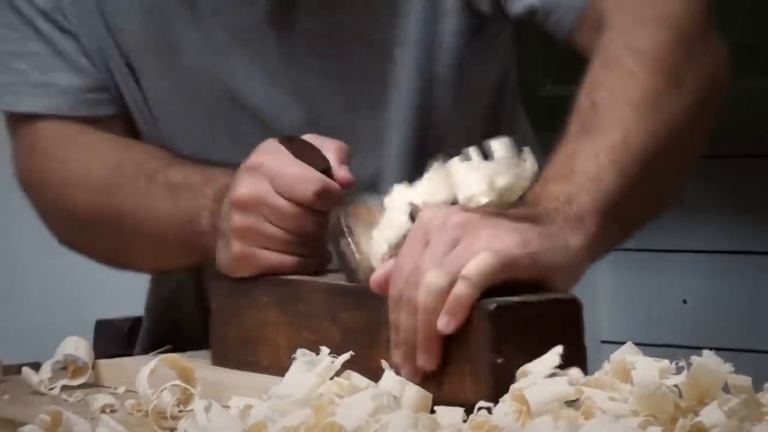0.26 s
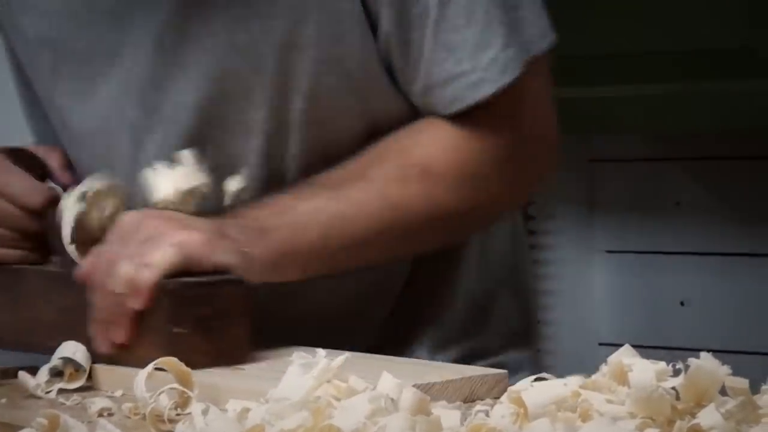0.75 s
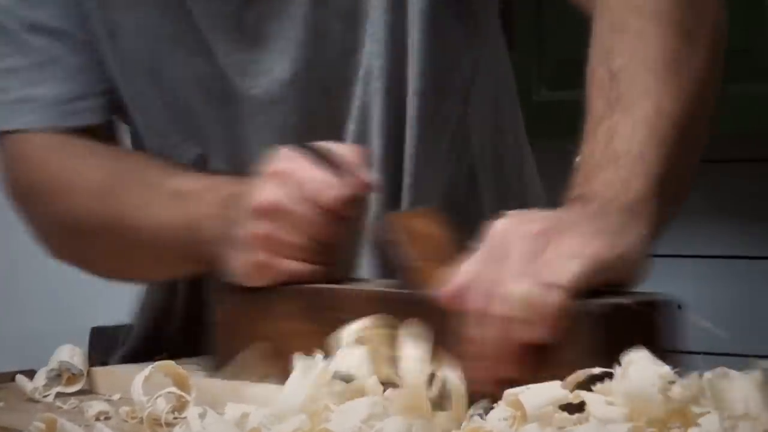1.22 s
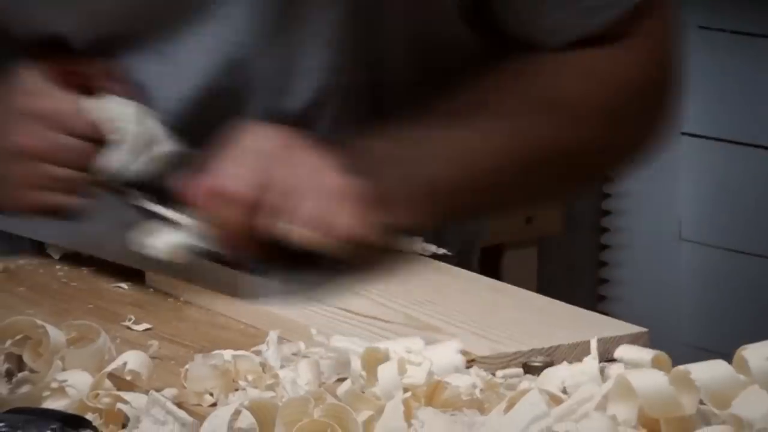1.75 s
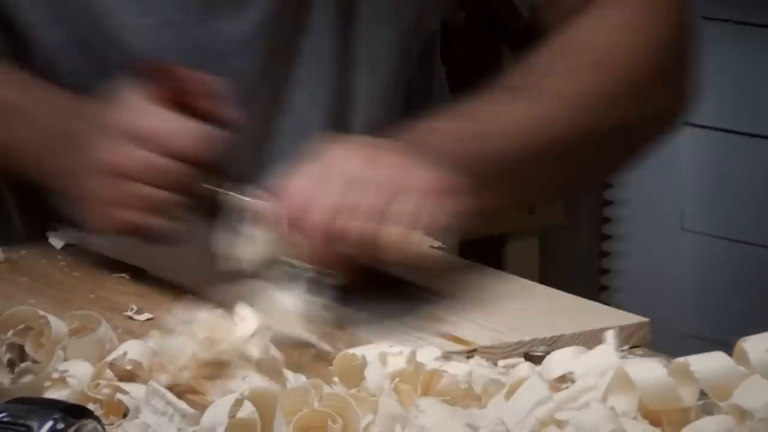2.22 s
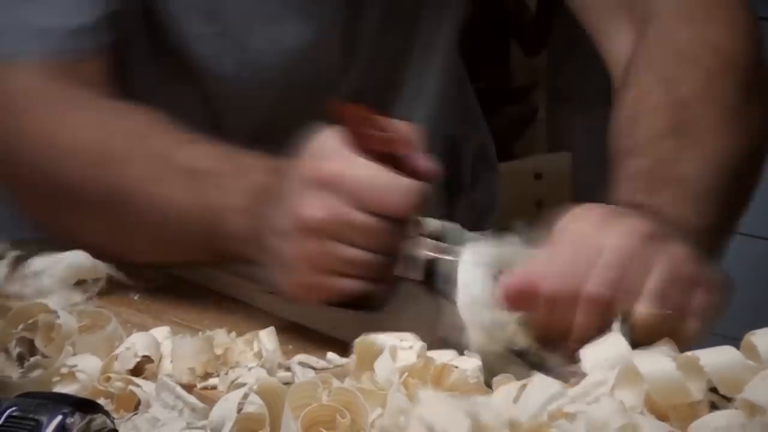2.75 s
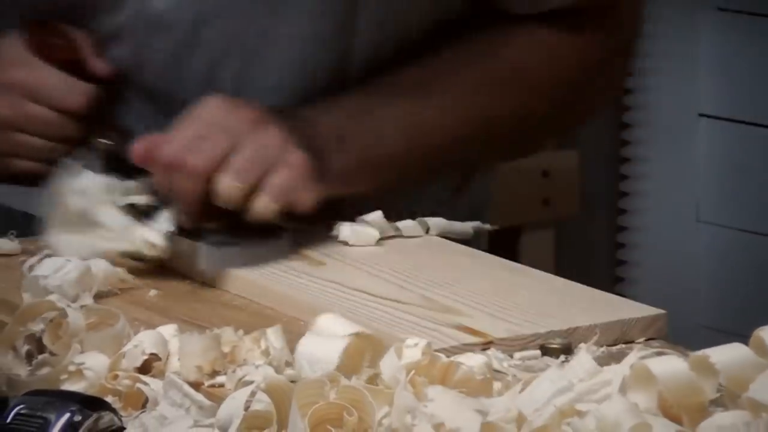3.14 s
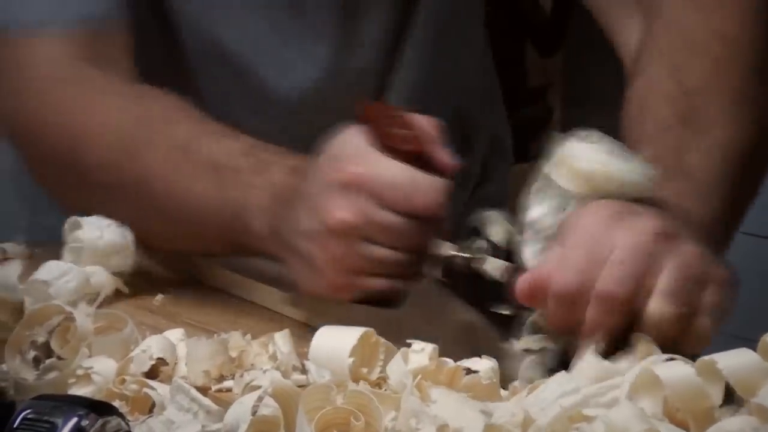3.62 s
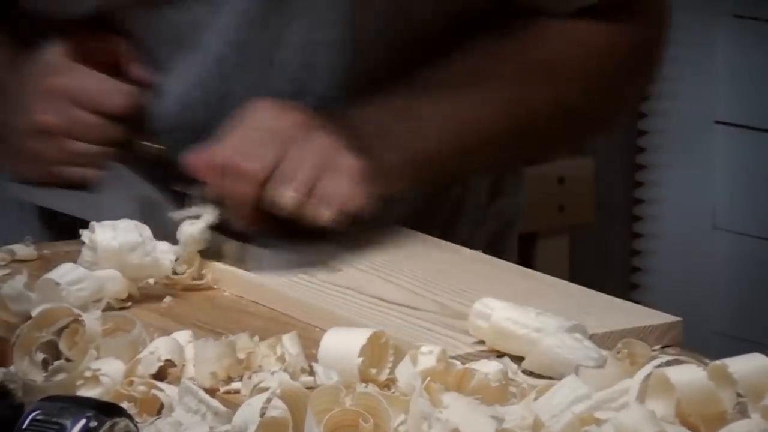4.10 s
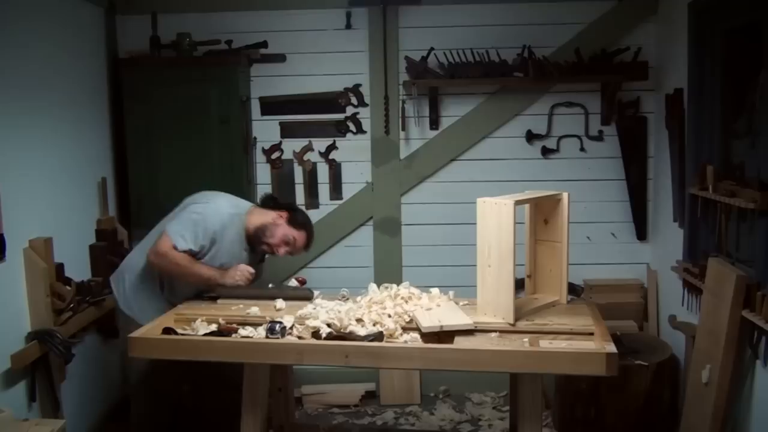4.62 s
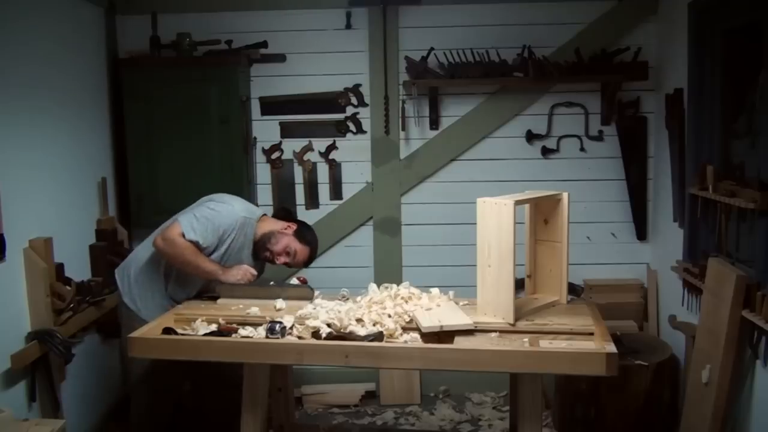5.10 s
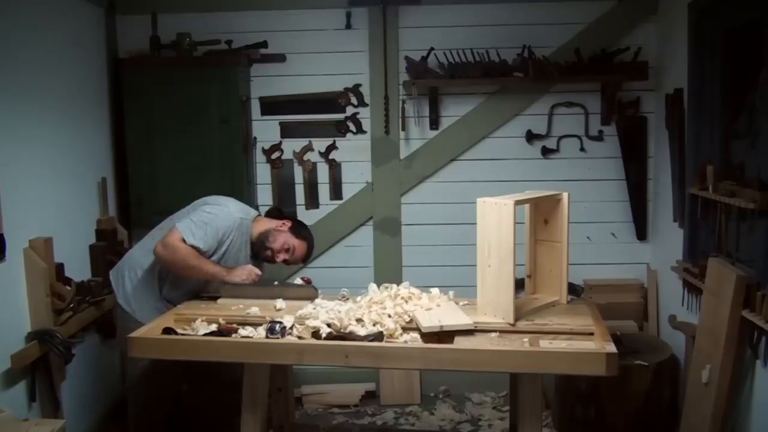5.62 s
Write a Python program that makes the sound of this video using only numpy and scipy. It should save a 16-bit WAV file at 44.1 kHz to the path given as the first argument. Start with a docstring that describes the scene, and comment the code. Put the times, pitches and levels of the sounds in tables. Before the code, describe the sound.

Hand planes take quick, heavy strokes along a wooden board, rasping, hissing and knocking, followed by faint strokes across a small workshop.

```python
"""A small workshop, the microphone near the bench: hand planes take quick, heavy strokes along a board.
First a wooden plane, then a steel one: each push tears wood fibres into a curling shaving, each pull
drags the sole back. Bursts of clicks and rubbing noise ring the resonances of plane, board and bench,
with judders, knocks, snaps, squeaks and short rings. At the end, light strokes come from across the shop."""
import sys
import numpy as np
from scipy import signal
from scipy.fft import rfft, irfft
from scipy.io import wavfile
from scipy.ndimage import uniform_filter1d, minimum_filter1d, map_coordinates

SR = 44100
rng = np.random.default_rng(int(sys.argv[2]) if len(sys.argv) > 2 else 0)


def master_out(mix):
    """Clip the mix to full scale and print it as 16-bit PCM to the path in sys.argv[1]."""
    frames = np.transpose(np.atleast_2d(mix))
    ceiling = np.clip(frames, -1, 1)
    pcm = np.round(ceiling * 32767).astype(np.int16)
    wavfile.write(sys.argv[1], SR, pcm)


N = 258426
TIME = np.arange(N) / SR

# Levels in the tables are relative; each layer has its own gain on top.
# Pushes of the wooden plane: (start [s], length [s], rise [s], force [dB],
# crispness of the top against the rasp [dB], crispness change by the end [dB])
WOOD_CUTS = [(0, 0.2, 0.00092, -16, -4.5, 3.5), (0.869, 0.24, 0.0027, -16.5, -3.5, 2.5)]
# Wooden plane dragged back, catching twice, then scuffing as it is set down; one list per course:
# (time [s], force [dB], crispness [dB])
WOOD_PULLS = [
    [(0.47, -36.5, -12.5), (0.53, -23, -18), (0.59, -23, -10.5), (0.635, -14, -14.5), (0.69, -22.5, -4),
     (0.725, -17.5, -15)],
    [(1.306, -38.5, 15.5), (1.32, -37, 9.5), (1.35, -42, 12)],
]
# Steel plane sliding back: (start [s], length [s], rise [s], force [dB], crispness [dB],
# crispness change by the end [dB], lead of the top at first [dB])
STEEL_PULLS = [ (1.451, 0.21, 0.02, -25.5, 12, -11, 5.5), (2.22, 0.23, 0.012, -26.5, 10, -9, 1.5),
               (2.974, 0.23, 0.018, -28, 7.5, -4.5, 0.5), (3.851, 0.25, 0.054, -25.5, 9.5, -7.5, 4), ]
# Strokes across the shop: (start [s], length [s], rise [s], force [dB], crispness [dB],
# crispness change by the end [dB], bench against force [dB], board against bench [dB])
FAR_STROKES = [ (4.623, 0.015, 0.0013, -47.5, -2.5, 0, -1, -13), (4.69, 0.091, 0.016, -52, -10.5, 1, 1, -9),
               (5.222, 0.18, 0.0013, -56.5, -8, -3.5, 2, -3.5),
               (5.53, 0.15, 0.015, -59.5, -2.5, -0.5, -13.5, 15.5), ]
# Pushes of the steel plane: (start [s], length [s], time to gather speed [s], force [dB],
# force change at speed [dB], crispness [dB], crispness change at speed [dB],
# shaving ring at first [Hz], shaving ring at speed [Hz], ring against the rasp [dB])
STEEL_CUTS = [ (1.806, 0.18, 0.1, -16.5, -2, -0.5, 8.5, 4760, 6800, -8.5),
              (2.574, 0.18, 0.071, -20, 1, -2.5, 9, 3760, 7900, -7.5),
              (3.329, 0.29, 0.1, -12, -2, -7.5, 5.5, 2508, 4170, -4.5),
              (4.215, 0.21, 0.162, -13, -11, -3, 16, 4280, 8800, -2.5), ]
# Broad colours of blade, sole and bench contacts: (frequency [Hz], level [dB])
WOOD_RASP = [(710, -30.5), (1200, -0.5), (2220, -5.5), (3440, -7), (5850, -10), (6920, -8.5),
             (10500, -17.5), (14500, -40)]
STEEL_RASP = [(710, -46), (1200, -12), (1510, -10), (2390, -2.5), (2940, -9.5), (4750, 1.5), (5390, -5.5),
              (6840, 4), (10500, -4), (14500, -28)]
SOLE_RUB = [(710, -34.5), (1200, -5.5), (2410, 1.5), (4150, -1), (4700, 0), (5850, -3.5), (6770, -1.5),
            (10900, -12), (14500, -29.5)]
BENCH = [(35, -56), (48, -39), (72, -22), (100, -32), (137, -12.5), (488, 2.5), (669, 1), (816, -0.5),
         (1160, -4.5), (1400, -11.5), (1820, -25.5), (3080, -120)]
# Colour of the room tone: (frequency [Hz], level [dB])
AIR = [(35, -51), (70, -26.5), (100, -7.5), (220, -3.5), (290, 2.5), (400, 1.5), (620, -13.5), (997, -9),
       (1820, -21.5), (2470, -14), (3110, -22), (3580, -17.5), (15400, -32)]
# Resonances of the two planes: (frequency [Hz], width [Hz], level [dB])
WOOD_BODY = [(1797, 76, 3), (2250, 310, 4.5), (2850, 49, -1.5), (3844, 45, 2.5), (4940, 170, -4),
             (6500, 84, -8.5)]
STEEL_BODY = [(2430, 11, -4.5), (4750, 200, 3), (5800, 55, 1.5), (6800, 160, 1), (7740, 340, -5.5),
              (8540, 34, 2)]
# Modes of the board on its bench: (frequency [Hz], level [dB])
BOARD = [(565.2, -30), (662.1, -32.5), (952.8, -33.5), (1028, -32), (1130, -30), (1314, -33.5), (1389, -47)]
# The plane bumps on the board: (time [s], peak [dB])
KNOCKS = [(0.729, -2.5), (0.869, 0), (1.315, 0), (1.343, -9), (1.787, -7), (2.164, -11), (2.503, -13),
          (2.621, -15.5), (3.32, -11), (3.645, -18), (4.459, -12.5), (5.459, -43.5)]
# The blade bites, the sole catches or a shaving snaps off: (time [s], peak [dB])
SNAPS = [(0.163, 11.5), (0.2414, 6.5), (0.8687, 9.5), (0.899, -12.5), (1.3094, -9), (1.452, -7.5),
         (1.803, 4), (2.579, -5), (3.3295, 4), (4.2153, 3.5), (5.2282, -33)]
# One resonance of plane, board or bench stands out: a squeak or groan of friction, or a short
# ring at a blow: (start [s], length [s], pitch [Hz], level [dB])
SQUEAKS_AND_RINGS = [(0.172, 0.13, 353.3, -23), (.47, .13, 148, -34), (0.544, 0.12, 673.5, -19.5),
                     (0.728, 0.023, 154, -24.5), (0.867, 0.017, 7900, -19.5), (1.446, 0.019, 6660, -18.5),
                     (1.789, 0.044, 574, -27), (1.816, 0.034, 4800, -18), (1.828, 0.073, 73.4, -45.5),
                     (1.978, .11, 570, -29), (2.604, 0.069, 75, -46.5), (2.723, 0.062, 572, -30.5),
                     (3.335, 0.06, 2447, -17.5), (3.767, 0.069, 581, -28.5), (4.306, 0.13, 567.6, -27.5)]
# The plane judders on the board, mostly as it turns round between strokes:
# (start [s], length [s], bench rumble [dB], board against bench [dB])
JUDDERS = [ (0.2, 0.18, -20.5, 3.5), (0.479, 0.083, -26.5, 0.5), (1.168, 0.08, -30, 10),
           (1.313, 0.072, -19.5, 3.5), (1.678, 0.03, -30, 2.5), (1.999, 0.09, -28.5, 2),
           (2.152, 0.04, -27, -3.5), (2.439, 0.04, -36, 1), (2.603, 0.043, -26.5, -6),
           (2.781, 0.05, -28, 1), (2.893, 0.06, -35, -5.5), (3.163, 0.22, -35.5, 1),
           (3.655, 0.16, -28.5, -1), (4.454, 0.11, -31, 0), ]
# Dying of the workshop's reflections: (frequency [Hz], time to fall 60 dB [s])
ROOM = [(150, 0.27), (1000, 0.66), (5000, 0.12), (14000, 0.19)]
# Grain of cutting, sliding and shaking contacts: (fibres a second [1/s], size spread [dB],
# smooth rubbing against clicks [ratio], slips a second [1/s], slip depth [ratio], bunching [dB])
TEARING = (3800, 2, 0.56, 160, 0.054, 1.4)
RUBBING = (9700, 1.3, 0.93, 420, 0.097, 0.69)
JUDDERING = (2500, 2.67, 0.72, 37, 0.095, 2.9)

AIR_DB = -60
CLOSE_END_S = 4.622  # the scene changes here: the close sound, room sound included, ends at once
EDGE_HZ = 14500  # upper edge of the microphone's band
START_DB = 19.5  # slides and judders start this far under their force
# The steel blade bites thin and bright, then takes hold; speed builds in one smooth step
BITE_DB, BITE_S, GATHER_S = 8.5, 0.013, 0.022
JUDDER_RISE_S, JUDDER_SAG_DB_PER_S = 0.0059, 26
KNOCK_T60_S, SNAP_T60_S = 0.2, 0.035


def amp(db):
    """Decibels to gain."""
    return 10 ** (np.asarray(db) / 20)


def evened(x):
    """Scales to an rms of one."""
    return x / np.sqrt(np.mean(x ** 2) + 1e-20)


def steadied(x):
    """Holds the slow level at one and leaves the grain."""
    return x / np.sqrt(uniform_filter1d(x ** 2, size=4000) + 1e-12)


def read(points, hz):
    """Reads a table on a log-frequency axis."""
    f, value = np.transpose(points)
    return np.interp(np.log(hz + 1), np.log(f + 1), value)


def add(mix, s, sound):
    """Adds a sound to the mix at time s."""
    part = mix[max(round(s * SR), 0):][:len(sound)]
    part += sound[:len(part)]


def wander(n, rate):
    """Smooth chance of about unit size that changes about rate times a second."""
    return np.interp(np.arange(n) * rate / SR, np.arange(4000), rng.standard_normal(4000))


def resonate(x, hz, width):
    """A steep resonance that follows the curve hz."""
    turn = np.exp(2j * np.pi * np.cumsum(hz * np.ones(len(x))) / SR)
    r = np.exp(-np.pi * width / SR)
    # shift the pitch down to zero, smooth with a double pole, shift back up
    smoothed = signal.lfilter([(1 - r) ** 2], [1, -2 * r, r * r], x / turn)
    return 2 * (turn * smoothed).real


def body(spectrum, modes, ring_db):
    """Causal impulse response of an object: a broad colour with resonances standing out of it."""
    hz = np.fft.rfftfreq(8192, 1 / SR)
    ring = sum(amp(db) ** 2 / (1 + ((hz - f) / width) ** 2) ** 2 for f, width, db in modes)
    power = amp(read(spectrum, hz)) ** 2 + amp(ring_db) ** 2 * ring
    log_gain = np.log(power + 1e-10) / 2
    circle = np.concatenate([log_gain, log_gain[-2:0:-1]])
    # minimum phase: the object answers as soon as it is struck
    return np.fft.ifft(np.exp(np.conj(signal.hilbert(circle)))).real[:len(hz)]


def board(width_hz, ring_db):
    """Response of the board lying on the bench."""
    return body(BENCH, [(hz, width_hz, db) for hz, db in BOARD], ring_db)


def fibres(n, per_s, spread_db, smooth, slip_hz, slip, clump_db):
    """Fibres break as clicks of all sizes over smooth rubbing, bunched as the plane sticks and slips."""
    size = amp(spread_db * np.minimum(rng.exponential(1, n), 4))
    clicks = size * rng.choice([-1, 1], n) * (rng.random(n) < per_s / SR)
    turns = np.cumsum(slip_hz * (1 + 0.23 * wander(n, 60))) / SR
    bunches = (1 + slip * np.cos(2 * np.pi * turns)) * amp(clump_db * wander(n, 90))
    return (evened(clicks) + smooth * rng.standard_normal(n)) * bunches


def bounced(x, echo=0.38, path_s=0.00111):
    """The board reflects the sound; the short path wanders irregularly, so bright bands shift."""
    at = np.arange(len(x))
    delay = path_s * SR * (1 + .25 * wander(len(x), 14))
    reflection = map_coordinates(x, [at - delay], order=3)
    return (x + echo * reflection) / np.hypot(1, echo)


def slide(start, length, rise_s, force_db, crisp_db, change_db, lead_db=0):
    """Course of an even stroke: the force rises and holds while the top leads, then brightens or dulls."""
    t = np.linspace(0, length, 100)
    slack = np.exp(-t / rise_s)
    level_db = force_db - START_DB * slack
    top_db = crisp_db + lead_db * slack + change_db * (t / length) ** 2
    return np.column_stack([start + t, level_db, top_db])


def push(start, length, gather_s, force_db, ease_db, crisp_db, brighten_db, slow_hz, fast_hz):
    """Course of a steel cut: a bite, then speed shifts the force, brightens the top, lifts the ring."""
    t = np.linspace(0, length, 100)
    bite_db = BITE_DB * np.exp(-t / BITE_S)
    speed = 1 / (1 + np.exp((gather_s - t) / GATHER_S))
    level_db = force_db - bite_db + ease_db * speed
    top_db = crisp_db + bite_db + brighten_db * speed
    curl_hz = slow_hz * (fast_hz / slow_hz) ** speed
    return np.column_stack([start + t, level_db, top_db, curl_hz])


def judder(start, length, bench_db, board_db):
    """Course of a judder: a quick swell that settles."""
    t = np.linspace(0, length, 100)
    level_db = bench_db - START_DB * np.exp(-t / JUDDER_RISE_S) - JUDDER_SAG_DB_PER_S * t
    return np.column_stack([start + t, level_db, np.full(len(t), board_db)])


def shaking(course, bench_db, board_db, settle_db=0):
    """A stroke's force shakes the work; the bench settles towards the end while the board sounds on."""
    s, force_db = course[:, 0], course[:, 1]
    settled_db = settle_db * ((s - s[0]) / (s[-1] - s[0])) ** 2
    return np.column_stack([s, force_db + bench_db - settled_db, board_db + settled_db / 2])


def stroke(rows, response, grain, split_hz, fall_db_per_s, curl_db=0, curl_width_hz=1000):
    """Breaking fibres ring a body; force sets the level and a sharper contact lifts the top."""
    s, *columns = np.transpose(rows)
    t = np.arange(s[0], s[-1] + .5, 1 / SR)
    force_db, top_db, *curl_hz = (np.interp(t, s, c) for c in columns)
    after_s = np.maximum(t - s[-1], 0)
    force_db = force_db - fall_db_per_s * after_s  # the plane coasts to a stop
    top_db = top_db - 15 * after_s  # and dulls as it slows
    sound = evened(signal.fftconvolve(fibres(len(t), *grain), response)[:len(t)])
    if curl_hz:  # the shaving's ring follows the speed of the plane
        curl = resonate(fibres(len(t), *grain), curl_hz[0], curl_width_hz)
        sound = sound + amp(curl_db) * evened(resonate(curl, curl_hz[0], curl_width_hz))
    sound = bounced(sound)
    low = signal.sosfiltfilt(signal.butter(4, split_hz, fs=SR, output="sos"), sound)
    sound = steadied(low) + amp(top_db) * steadied(sound - low)
    return s[0], amp(force_db) * sound * signal.windows.tukey(len(t), 100 / len(t))


def blows(rows, response):
    """Each blow is a short dying rattle of contacts that rings a body."""
    out, t = np.zeros(N), TIME[:SR // 3]
    for s, db, t60 in rows:
        rattle = rng.standard_normal(len(t)) * np.exp(-np.log(1000) * t / t60)
        sound = signal.fftconvolve(rattle, response)
        add(out, s, amp(db) * sound / abs(sound).max())
    return out


def air():
    """Quiet steady room tone: coloured noise."""
    colour = amp(read(AIR, np.fft.rfftfreq(N, 1 / SR)))
    return amp(AIR_DB) * evened(irfft(rfft(rng.standard_normal(N)) * colour, N))


def loose_shavings():
    """Curled shavings rustle steadily around the plane, under the strokes and between them."""
    rustle = signal.fftconvolve(fibres(N, *JUDDERING), body(SOLE_RUB, STEEL_BODY, ring_db=-15.5))[:N]
    return amp(-38.0) * evened(rustle)


def wooden_plane():
    """Fibres ring the wooden body: a hollow rasp on the push, a duller scrape on the way back."""
    out = np.zeros(N)
    blade = body(WOOD_RASP, WOOD_BODY, ring_db=-6.5)
    sole = body(WOOD_RASP, WOOD_BODY, ring_db=-1.0)
    for row in WOOD_CUTS:
        add(out, *stroke(slide(*row), blade, TEARING, split_hz=3400, fall_db_per_s=116.5))
    for course in WOOD_PULLS:
        add(out, *stroke(course, sole, RUBBING, split_hz=4870, fall_db_per_s=200.5))
    return amp(0.37) * out


def bench():
    """Every close stroke and every judder shakes the board and the bench under it."""
    out = np.zeros(N)
    under_wood, under_steel = board(width_hz=20, ring_db=36.5), board(width_hz=25, ring_db=27)
    wood = [shaking(slide(*row), bench_db=-9.5, board_db=13, settle_db=4.5) for row in WOOD_CUTS]
    wood += [shaking(np.array(course), bench_db=-6.5, board_db=10.5) for course in WOOD_PULLS]
    steel = [shaking(push(*row), bench_db=-11.5, board_db=1.5, settle_db=13) for *row, _ in STEEL_CUTS]
    steel += [shaking(slide(*row), bench_db=-13.5, board_db=10.0, settle_db=4) for row in STEEL_PULLS]
    for course in wood:
        add(out, *stroke(course, under_wood, JUDDERING, split_hz=413, fall_db_per_s=143.5))
    for course in steel + [judder(*row) for row in JUDDERS]:
        add(out, *stroke(course, under_steel, JUDDERING, split_hz=395, fall_db_per_s=170.5))
    return amp(-4.5) * out


def snaps():
    """Bites, catches and snapping shavings: very short rattles ring the steel sole's response."""
    rows = [(s, db, SNAP_T60_S) for s, db in SNAPS]
    return amp(-15.0) * blows(rows, body(SOLE_RUB, STEEL_BODY, ring_db=-12.5))


def squeaks_and_rings():
    """One resonance stands out, a friction squeak or a ring at a blow, wavering in pitch and level."""
    out = np.zeros(N)
    for s, length, hz, db in SQUEAKS_AND_RINGS:
        n = int(length * SR)
        pitch = hz * (1 + .06 * wander(n, hz / 8))
        tone = np.sin(2 * np.pi * np.cumsum(pitch) / SR) * (1 + .6 * wander(n, hz / 15))
        add(out, s, amp(db) * evened(tone) * signal.windows.tukey(n, .6))
    return out


def knocks():
    """The plane bumps on the board, which rings with the bench."""
    rows = [(s, db, KNOCK_T60_S) for s, db in KNOCKS]
    return amp(-8.0) * blows(rows, board(width_hz=28, ring_db=22.5))


def steel_plane():
    """Tearing fibres and the curling shaving's ring make a rising zip; the returning sole hisses."""
    out = np.zeros(N)
    blade = body(STEEL_RASP, STEEL_BODY, ring_db=-3.5)
    sole = body(SOLE_RUB, STEEL_BODY, ring_db=-1.5)
    for *row, ring_db in STEEL_CUTS:
        add(out, *stroke(push(*row), blade, TEARING, split_hz=5520, fall_db_per_s=124.0,
                         curl_db=ring_db, curl_width_hz=2580))
    for row in STEEL_PULLS:
        add(out, *stroke(slide(*row), sole, RUBBING, split_hz=4010, fall_db_per_s=181.5))
    return amp(-1.0) * out


def far_plane():
    """Light strokes across the shop, dull and quiet: rubbing rings a wooden body, board and bench."""
    out = np.zeros(N)
    plane, work = body(WOOD_RASP, WOOD_BODY, ring_db=-4.5), board(width_hz=45, ring_db=19)
    for *row, bench_db, board_db in FAR_STROKES:
        course = slide(*row)
        shake = shaking(course, bench_db, board_db)
        add(out, *stroke(course, plane, RUBBING, split_hz=3450, fall_db_per_s=172))
        add(out, *stroke(shake, work, JUDDERING, split_hz=750, fall_db_per_s=166))
    return amp(-1) * out


def workshop(x, wet_db):
    """Direct sound plus sparse reflections, each band dying at its own speed."""
    at = np.arange(150, SR - 20, 20)
    taps = np.zeros(SR)
    taps[at + rng.integers(0, 20, len(at))] = rng.choice([-1., 1.], len(at))
    hz, t, bands = signal.stft(taps, SR, nperseg=256)
    decay = np.exp(-np.log(1000) * t / read(ROOM, hz)[:, None])
    tail = signal.istft(bands * decay, SR)[1]
    return x + amp(wet_db) * signal.fftconvolve(x, tail / np.linalg.norm(tail))[:N]


def scene():
    """Close planing, which gives way at once to the far strokes, over steady room tone."""
    planing = loose_shavings() + wooden_plane() + bench() + squeaks_and_rings() + steel_plane()
    close = workshop(planing, wet_db=-7.5) * (TIME < CLOSE_END_S)
    impacts = workshop(snaps() + knocks(), wet_db=-15.0)
    far = workshop(far_plane(), wet_db=-14)
    return (air() + close + impacts + far)[None]


def record(dry):
    """The microphone sheds the deepest bass, a quick limiter holds the peaks; then the band limit."""
    lean = signal.sosfilt(signal.butter(3, 55, "high", fs=SR, output="sos"), dry)
    allowed = minimum_filter1d(np.minimum(1, .88 / (abs(lean) + 1e-9)), size=41)
    held = lean * uniform_filter1d(allowed, size=41)
    band = signal.firwin(255, EDGE_HZ, window=("kaiser", 8), fs=SR)
    return signal.oaconvolve(held, band[None], "same")


dry = scene()
out = record(dry)
master_out(out)
```